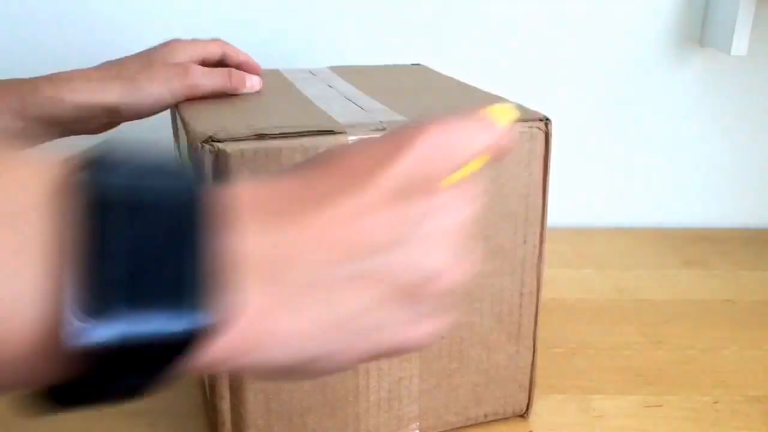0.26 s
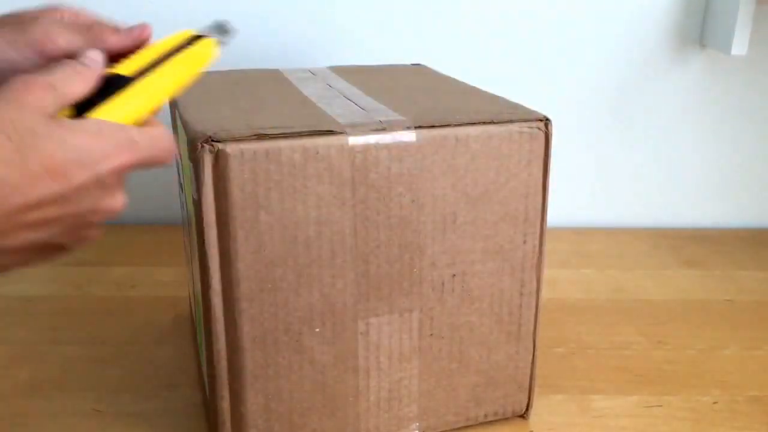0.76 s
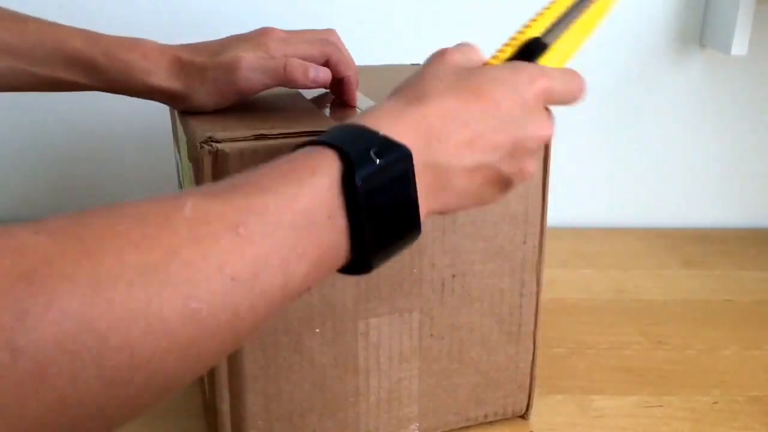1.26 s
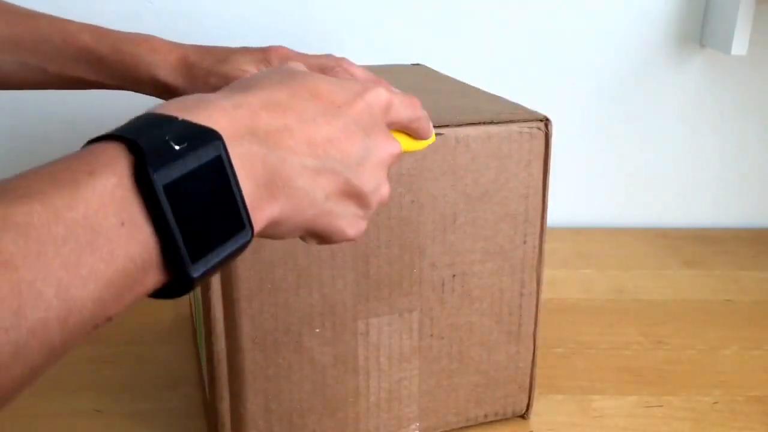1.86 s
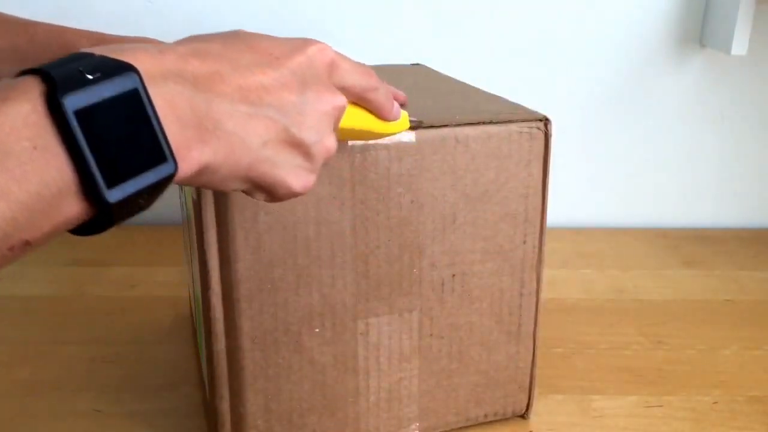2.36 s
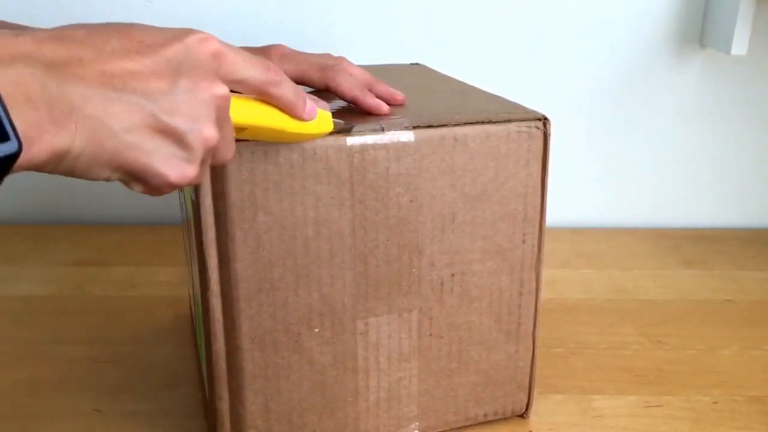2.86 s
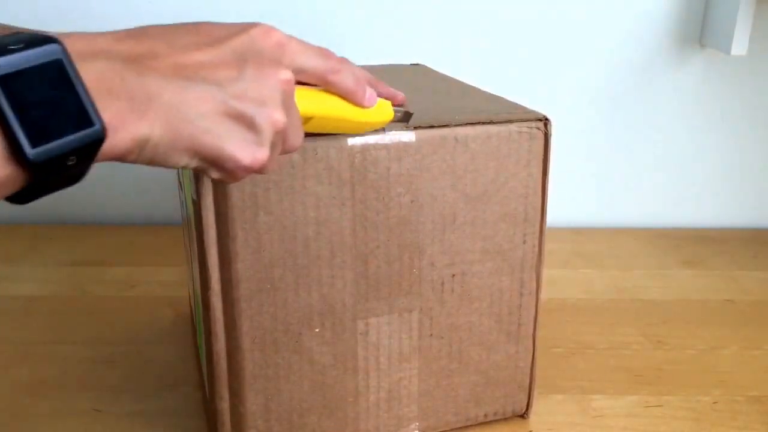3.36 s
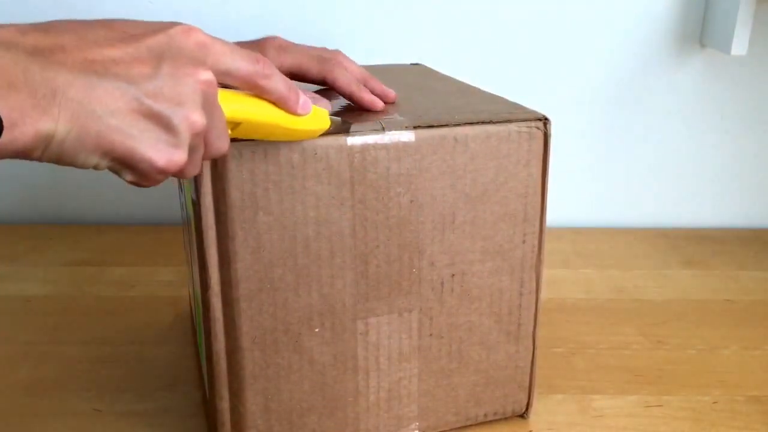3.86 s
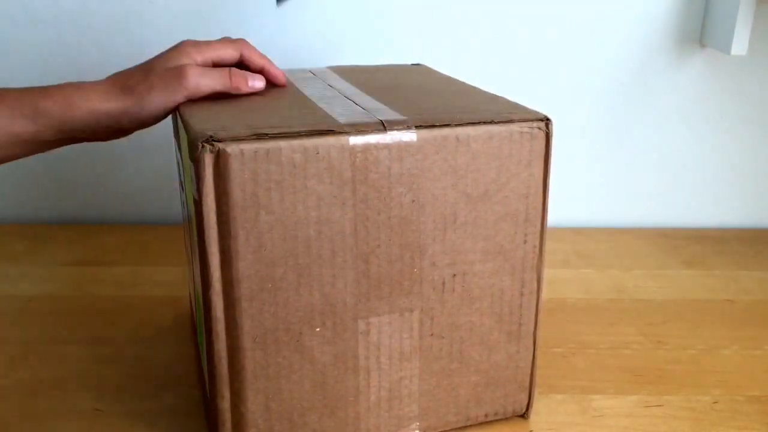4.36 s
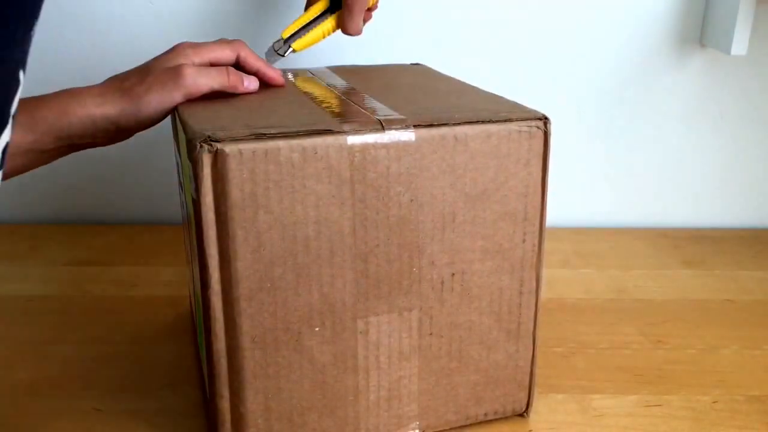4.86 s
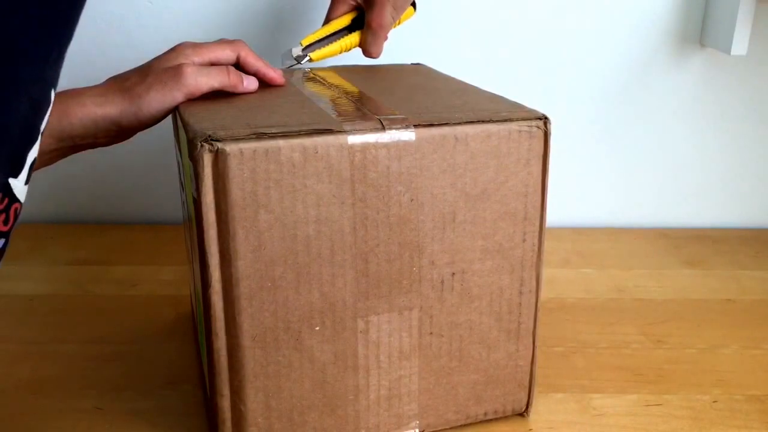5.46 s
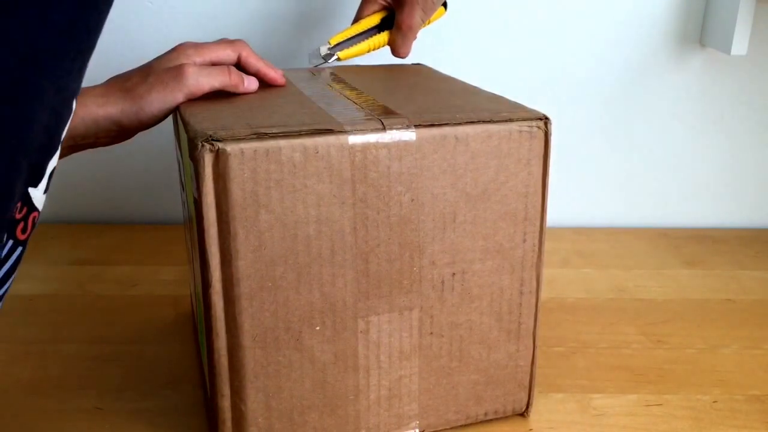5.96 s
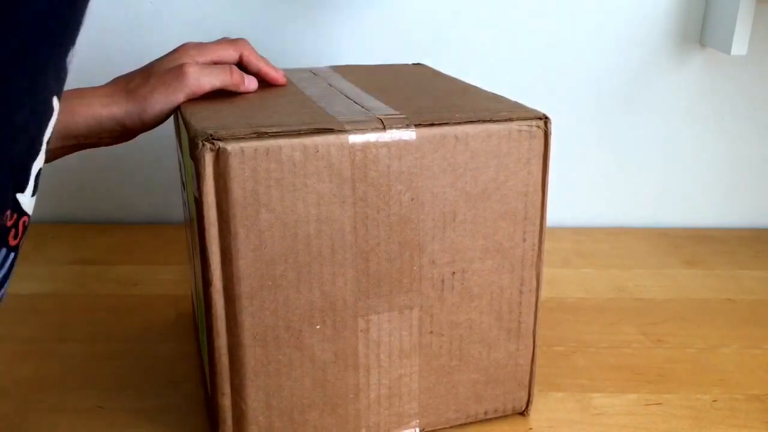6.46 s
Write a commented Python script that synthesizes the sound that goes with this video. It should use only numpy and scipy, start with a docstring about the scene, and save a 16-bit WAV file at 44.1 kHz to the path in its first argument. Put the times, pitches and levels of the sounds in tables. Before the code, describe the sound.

Close up in a small hard-walled room, hands work a knife over a taped carton. Thin plastic and steel clicks come irregularly, over soft rubbing and low boxy thuds, the strongest early on. Brief hissy scrapes cut tape at the start and midway; later the action quiets into gritty little sawing strokes, ending with a click and a cluster of hollow knocks. Faint room air lies beneath.

```python
"""A utility knife is handled over a taped cardboard box on a wooden table in a small bare room.
From the start the loose blade clicks in its plastic handle: noise bursts ring the knife's resonances.
Hands knock (force pulses into the modes) and rub the hollow box; the blade cuts at the start and near
2.5 s, and saws through the tape late on (uneven noise through resonances); last knocks and clicks follow.
Throughout, the walls answer sharp sounds with a short bright tail over a faint bed of room air."""
import sys
import numpy as np
from scipy import signal
from scipy.fft import rfft, irfft, next_fast_len
from scipy.io import wavfile
from scipy.ndimage import uniform_filter1d

SR = 44100
rng = np.random.default_rng(int(sys.argv[2]) if len(sys.argv) > 2 else 0)


def put_to_file(sound):
    """Save the sound as 16-bit audio at rate SR, in the file named by the first command-line argument."""
    columns = np.atleast_2d(sound).T  # one column per channel
    safe = np.clip(columns, -1, 1)
    whole_steps = np.round(safe * 32767)
    wavfile.write(sys.argv[1], SR, whole_steps.astype(np.int16))


N = 295690

# board surface resonances: (centre [Hz], width [Hz], level [dB])
BOARD = [(370, 80, -7), (618, 50, -3.5), (797, 160, -8.5), (1210, 520, -10), (1740, 430, -10),
         (2550, 100, -6.5)]


def clicks(scatter_db=2.0, bounce_db=4.5, low_hz=1300, snap_db=2.5):
    """The blade slips, snaps home and rattles out; each click's mode levels are scattered at random."""
    # blade clicks: (time [s], loudest short-term rms before the high-pass [dB], handle shell [dB],
    # blade tip [dB], rattle decay constant [ms])
    click_list = [(0.102, -27, -8, -10, 1.8), (0.1092, -26, -10, -10.5, 1.5), (0.2303, -38.5, 4, -13, 0.73),
                  (0.3804, -63.5, -19, -19, 4), (0.417, -42.5, -26, -14, 1.1),
                  (0.4444, -37.5, -38, -19, 2.2), (0.639, -26, -24, -14, 1.7), (0.7904, -40, -22, -28, 1.4),
                  (0.8563, -47.5, -30, -24, 1.9), (0.8755, -29.5, -13, -21.5, 2.6),
                  (0.9746, -23.5, -38, -12.5, 0.72), (1.0968, -36.5, -29, -20, 3.1),
                  (1.3052, -51, -22, -15, 9.5), (1.3493, -36.5, -32, -20, 3.7), (1.439, -50, -30, -18, 5.1),
                  (1.4526, -27, -40, -16, 1.9), (1.4949, -38, -39, -21, 4.6), (1.61, -54.5, -28, -11, 4),
                  (1.6691, -58, -24, -14, 4), (1.7155, -29.5, -20, -15, 1.6),
                  (1.7489, -33.5, -14, -16, 2.1), (1.9516, -32, -17, -13.5, 3.2),
                  (2.0015, -42, -10, -22, 18), (2.169, -31, -8.5, -10.5, 1.2), (2.2787, -60, -16, -10, 4),
                  (2.318, -48.5, 3.5, -7, 16), (2.694, -50, -24.5, -14, 3.3), (3.057, -36, -8, -18, 11),
                  (3.3208, -26.5, -3, -12, 5.3), (3.529, -54, 4, -17, 2.3), (3.682, -48.5, 5, -17, 9.6),
                  (3.697, -48, -15, -13, 7.3), (3.85, -56, -24, -7, 2.4), (3.905, -43, -24, -13, 0.77),
                  (3.939, -36, -11, -15, 5.2), (3.95, -35, -16.5, -18, 2.2), (4.097, -31, -29, -15, 5),
                  (4.1234, -35, -6.5, -18, 6.5), (4.1628, -33, -27, -26, 6.9), (4.198, -41, -34, -16, 5.8),
                  (4.28, -37.5, -32, -28, 3.7), (4.327, -51, -28, -35, 4.8), (4.4069, -28, -27, -23, 4.7),
                  (4.4774, -39, -23, -17, 3.2), (4.655, -40, -33, -20, 6.9), (4.775, -61, -19, -23.5, 9.2),
                  (5.0905, -33, -52, -18, 5.2), (5.239, -59.5, -5, -22, 2), (5.267, -56.5, -24, -20, 3),
                  (5.3512, -52, -14, -15, 4.6), (5.3823, -54.5, -8, -22, 4), (5.602, -50, -22, -20, 4.3),
                  (6.0542, -42.5, -18, -18, 9.6), (6.2762, -37.5, 0, -18, 5), (6.404, -28.5, -36, -15, 3.8),
                  (6.5935, -45.5, -16, -21, 1.4), (6.6288, -46.5, -16, -18, 8.1)]
    # knife resonances: (centre [Hz], width [Hz], level before tilt and scatter [dB])
    knife_modes = [(1920, 70, 2.5), (2080, 270, 2), (2800, 130, -7.5), (3570, 440, 7.5), (4010, 330, 9.5),
                   (5680, 3150, 10), (6530, 520, -5), (8120, 1100, 10.5), (9160, 970, 14.5),
                   (10730, 870, 18), (12300, 1600, 8.5), (14400, 650, -12)]
    slip_ms, slip_per_rattle = 0.51, 0.29  # build-up constant, longer when the rattle is longer
    creep_db, creep_ms = -22.5, 4.5  # faint scrape as the blade starts to move
    slider_db, steel_db = -10, -7  # how strongly a click wakes these parts
    lead = 600  # samples before the snap
    out = np.zeros(N)
    t = (np.arange(3600) - lead) / SR
    scatters = rng.standard_normal((len(click_list), len(knife_modes)))
    noises = rng.standard_normal((len(click_list), len(t)))
    bounces = np.repeat(rng.standard_normal((len(click_list), len(t) // 30)), 30, axis=1)
    for (s, db, shell_db, tip_db, rattle_ms), scatter, noise, bounce in zip(
            click_list, scatters, noises, bounces):
        rise = t * 1000 / (slip_ms + slip_per_rattle * rattle_ms)
        fall = -t * 1000 / max(rattle_ms, .5)
        creep = (t < 0) * undb(creep_db) * np.exp(np.minimum(t, 0) * 1000 / creep_ms)
        envelope = np.exp(np.minimum(rise, fall)) + creep
        force = noise * undb(bounce_db * bounce) * envelope
        force[lead] += undb(snap_db)  # the moment steel meets its stop
        part_db = [shell_db, slider_db, slider_db, steel_db, tip_db]
        ring = 0
        for (hz, width_hz, mode_db), g in zip(knife_modes, scatter):
            tilt_db = np.interp(hz, [2400, 3370, 4200, 5660, 9700], part_db)
            ring = ring + undb(mode_db + tilt_db + scatter_db * g) * resonance(force, hz, width_hz)
        loudest = np.sqrt(uniform_filter1d(ring ** 2, 200).max())
        add(out, s - lead / SR, undb(db) * ring / loudest)
    # so small a body radiates no bass
    return signal.sosfilt(signal.butter(4, low_hz, "high", fs=SR, output="sos"), out)


def knocks(crack_ms=8.5, crack_hz=900):
    """A push and rebound (shorter wakes higher modes) and a dull crackle of crushed corrugation."""
    # hands and knife on the box: (time [s], thud peak [dB], cardboard crack peak [dB], contact time [ms])
    knock_list = [(0.102, -33.5, -47, 7.6), (0.303, -37, -45, 4), (1.008, -21, -47.5, 6.5),
                  (1.0146, -26, -56, 6.5), (1.192, -38.5, -65, 6.7), (1.243, -36.5, -63, 5.2),
                  (1.266, -54, -48, 4.1), (1.312, -46.5, -61, 8.6), (1.584, -35, -54.5, 4.9),
                  (1.946, -50.5, -42, 4.2), (2.171, -50.5, -54, 2.9), (2.313, -49.5, -52.5, 3.1),
                  (2.545, -41.5, -45, 3.7), (2.694, -37, -49, 3.9), (3.051, -52, -49.5, 5.5),
                  (3.316, -46, -46.5, 4), (3.679, -57, -44, 4.4), (3.713, -49.5, -51, 9.4),
                  (3.813, -53.5, -60, 2.4), (3.849, -49, -46.5, 2.1), (3.905, -36, -37.5, 3.9),
                  (3.947, -57, -43.5, 2.9), (4.009, -44.5, -49, 6), (4.306, -49.5, -52, 3.1),
                  (4.95, -50, -64.5, 5.4), (5.233, -55.5, -64, 5.5), (5.39, -47.5, -76, 6.4),
                  (6.56, -45, -55, 2.7), (6.592, -36, -36, 6), (6.627, -27, -34, 3.7),
                  (6.661, -34.5, -50, 6.9)]
    thuds, cracks = np.zeros(N), np.zeros(N)
    t = np.arange(SR // 2) / SR
    dull = signal.butter(1, crack_hz, fs=SR)
    noises = rng.standard_normal((len(knock_list), len(t)))
    for (s, thud_db, crack_db, contact_ms), noise in zip(knock_list, noises):
        phase = np.pi * np.minimum(t * 1000 / max(contact_ms, .3), 1)
        push = np.sin(2 * phase) * np.sin(phase)
        thud = box(push, air_db=5)
        crush = signal.lfilter(*dull, noise * np.exp(-t * 1000 / crack_ms))
        crack = resonate(crush, BOARD)
        add(thuds, s, undb(thud_db) * thud / np.abs(thud).max())
        add(cracks, s, undb(crack_db) * crack / np.abs(crack).max())
    return thuds, cracks


def box(force, air_db=0):
    """The hollow carton rings in its wall modes and pumps its air; air_db is added to the air mode."""
    # carton modes, the second being the air mode: (frequency [Hz], level before air_db [dB], t60 [s])
    box_modes = [(72, -18.5, 0.054), (134.3, -3.5, 0.31), (163.8, -4.5, 0.22), (188.2, -5.5, 0.21),
                 (232.1, -7, 0.14), (283.7, -10.5, 0.2), (382.6, -17.5, 0.4), (424, -9.5, 1),
                 (577, -36.5, 0.29)]
    rings = [undb(db) * resonance(force, hz, np.log(1000) / np.pi / t60) for hz, db, t60 in box_modes]
    return sum(rings) + (undb(air_db) - 1) * rings[1]


def sawing():
    """The blade saws along the tape: hiss with singing steel, flapping slit edges, shaken box walls."""
    # saw strokes: (full from [s], held [s], hiss [dB], flaps [dB], box wall [dB])
    saw_strokes = [(5.41, 0.085, -54, -65, -61.5), (5.605, 0.039, -58.5, -67, -61.5),
                   (5.69, .03, -55, -66.5, -60.5), (5.735, 0.054, -47.5, -60, -58),
                   (5.835, 0.036, -48, -62.5, -56.5), (5.98, 0.06, -48, -59.5, -55.5),
                   (6.045, 0.038, -48.5, -56.5, -55), (6.27, .13, -49.5, -61, -57)]
    # tape hiss spectrum, relative: (frequency [Hz], level per Hz [dB])
    tape_hiss = [(1180, -48.5), (2000, -26), (2290, -7.5), (3970, -12), (5740, -5), (11300, -5),
                 (15500, -14)]
    # flaps beside the cut: (centre [Hz], width [Hz], level [dB])
    slit_modes = [(433, 17, -4), (815, 32, 0.5), (1001, 55, 3.5), (1683, 180, -1), (2214, 28, 4.5)]
    # steel singing in the cut: (centre [Hz], width [Hz], level [dB])
    blade_modes = [(3630, 15, 14.5), (4490, 65, 18), (5680, 180, 6.5), (6430, 80, 12.5), (8060, 100, -3),
                   (8420, 140, 11), (9870, 390, -3)]
    gains = pressure(saw_strokes, rise_db_s=278, fall_db_s=329)
    return drag(gains, tape_hiss, slit_modes, grain_db=0.8, surge_db=1.3, air_db=-1.5, singing=blade_modes)


def sliding():
    """Slides: the blade drags through the tape at the start and near 2.5 s, hands rub elsewhere."""
    # slide strokes: (full from [s], held [s], hiss [dB], board surface [dB], box wall [dB])
    slide_strokes = [(0.0, 0.1, -41.5, -47, -52), (0.27, 0.056, -59.5, -62.5, -54.5),
                     (0.68, 0.13, -59, -79, -88), (0.9, .05, -68, -76, -81),
                     (1.03, 0.071, -56.5, -65.5, -50), (1.15, 0.14, -67.5, -70.5, -57),
                     (1.52, 0.26, -60.5, -91, -64.5), (1.77, 0.016, -65, -83, -69),
                     (2.0, 0.024, -67, -65, -71), (2.27, 0.12, -64, -70.5, -66.5),
                     (2.52, 0.14, -45.5, -53, -48.5), (2.7, 0.13, -47, -53.5, -49.5),
                     (3.1, 0.018, -55, -71, -73), (3.4, 0.017, -52.5, -65.5, -63.5),
                     (3.5, 0.06, -60.5, -72, -71.5), (3.68, 0.048, -60, -67, -61),
                     (3.9, 0.061, -57, -58.5, -57), (4.05, 0.021, -54, -68.5, -64),
                     (4.19, 0.1, -49.5, -72, -70), (4.42, 0.21, -71, -76, -77.5),
                     (4.7, 0.1, -74, -78.5, -79), (5.18, 0.16, -76, -89, -74),
                     (6.59, 0.083, -54, -63, -48.5)]
    # slide hiss spectrum, relative: (frequency [Hz], level per Hz [dB])
    slide_hiss = [(1180, -36), (2000, -19.5), (2540, -4), (3150, -15), (3460, -9), (6750, -10),
                  (7550, -9.5), (11600, -2.5), (15500, -15.5)]
    gains = pressure(slide_strokes, rise_db_s=388, fall_db_s=239)
    return drag(gains, slide_hiss, BOARD, grain_db=1.04, surge_db=2.2, air_db=3.0)


def drag(gains, hiss_colour, surface, grain_db, surge_db, air_db, singing=()):
    """Sliding contact hisses, scrapes the surface resonances and shakes the box walls."""
    hiss_gain, surface_gain, wall_gain = gains
    slips = grit(grain_db, grain_ms=3.3, surge_db=surge_db)
    hiss = unit(colour(slips + resonate(slips, singing), hiss_colour))
    scrape = unit(resonate(slips, surface))
    shake = grit(spread_db=2.5, grain_ms=8.0)
    steady_rms = np.sqrt(np.mean(box(shake, air_db) ** 2))
    walls = box(wall_gain * shake, air_db) / steady_rms  # gain ahead of the modes: they ring on
    return hiss_gain * hiss + surface_gain * scrape + walls


def pressure(strokes, rise_db_s, fall_db_s):
    """Each stroke swells, holds and dies away; gains of hiss, surface and wall, the loudest stroke leading."""
    t = np.arange(N) / SR
    out = 0
    for s, held_s, *levels_db in strokes:
        swell_db = -rise_db_s * np.maximum(s - t, 0)
        fade_db = -fall_db_s * np.maximum(t - s - held_s, 0)
        out = np.maximum(out, undb(swell_db + fade_db) * undb(levels_db)[:, None])
    return out


def grit(spread_db, grain_ms, surge_db=2.98, surge_ms=12.0):
    """Dense slips of unequal size that come in surges as the contact grabs and lets go; rms 1."""
    return unit(uneven(spread_db, grain_ms) * uneven(surge_db, surge_ms) * rng.standard_normal(N))


def uneven(spread_db, ms):
    """Random gains held for ms and slewed."""
    size = max(int(ms * SR / 1000), 1)
    gains = undb(spread_db * rng.standard_normal(N // size + 1))
    return uniform_filter1d(np.repeat(gains, size)[:N], size)


def wandering_echoes(x, turns_hz=0.8):
    """The knife wanders, so its echoes blend between two spots of the room, each with its own tail."""
    spot = 2 * np.pi * turns_hz * np.arange(N) / SR
    return room(x * np.cos(spot)) + room(x * np.sin(spot))


def room(x, first_ms=1.2):
    """Diffuse noise tail of unit energy, rising over first_ms; each band decays at its own rate."""
    # room bands: (centre [Hz], t60 [s], relative starting level [dB])
    room_bands = [(300, 0.17, 6), (1260, 0.37, 1), (3478, 0.25, 8), (7300, 0.24, 5), (12400, 0.17, 9)]
    t = np.arange(int(SR * .6)) / SR
    hz, t60_s, db = np.transpose(room_bands)
    log_hz = np.log(np.maximum(np.fft.rfftfreq(len(t), 1 / SR), 1))
    noise = rfft(rng.standard_normal(len(t)))
    tail = 0
    for k, share in enumerate(np.eye(len(room_bands))):  # overlapping bands that add up to white
        band = irfft(noise * np.interp(log_hz, np.log(hz), share), len(t))
        tail = tail + undb(db[k] - 60 * t / t60_s[k]) * band
    tail = tail * np.minimum(t * 1000 / first_ms, 1)
    return signal.fftconvolve(x, tail / np.sqrt(np.sum(tail ** 2)))[:N]


def room_air(rms_db=-71.5):
    """Steady background: coloured Gaussian noise."""
    # background spectrum, relative: (frequency [Hz], level per Hz [dB])
    air_spectrum = [(18, -56), (30, 6), (133, 13.5), (728, -4.5), (1770, -8), (4090, -11), (4420, -10),
                    (7650, -16.5), (11000, -9.5), (15500, -41)]
    return undb(rms_db) * unit(colour(rng.standard_normal(N), air_spectrum))


def undb(db):
    """Decibels to amplitude."""
    return 10 ** (np.asarray(db) / 20)


def unit(x):
    """Scale to rms 1."""
    return x / np.sqrt(np.mean(x ** 2))


def resonance(x, hz, width_hz):
    """Two-pole band-pass, gain 1 at the centre."""
    return signal.lfilter(*signal.iirpeak(hz, hz / width_hz, fs=SR), x)


def resonate(x, modes):
    """Sum of (Hz, width Hz, dB) resonances; neighbours swing in opposite sense."""
    out = 0
    for k, (hz, width_hz, db) in enumerate(modes):
        out = out + (-1) ** k * undb(db) * resonance(x, hz, width_hz)
    return out


def colour(x, points):
    """Shape by (Hz, dB) points joined on a log-frequency axis."""
    hz, db = np.transpose(points)
    size = next_fast_len(len(x))
    f = np.maximum(np.fft.rfftfreq(size, 1 / SR), 1)
    gain = undb(np.interp(np.log(f), np.log(hz), db))
    return irfft(rfft(x, size) * gain, size)[:len(x)]


def add(out, s, x):
    """Mix x into out from time s."""
    i = int(s * SR)
    out[i:i + len(x)] += x[:len(out) - i]


def scene(echo_db=-0.5):
    """Mix all layers; the thuds ring on by themselves, so only sharp sounds show the room."""
    thuds, cracks = knocks()
    sharp = clicks() + cracks
    echoes = undb(echo_db) * wandering_echoes(sharp)
    return (sharp + echoes + thuds + sliding() + sawing() + room_air())[None]


def record(dry, top_hz=15600):
    """The microphone thins the deepest bass and the top octave; the recorder cuts above top_hz."""
    # microphone response: (frequency [Hz], level [dB])
    mic_response = [(25, -18.5), (40, -1.5), (70, 1.5), (12000, -0.5), (13500, -6.5), (15500, -9.5)]
    top_cut = signal.ellip(10, .2, 70, top_hz, fs=SR, output="sos")
    return signal.sosfilt(top_cut, colour(dry[0], mic_response))[None]


dry = scene()
out = record(dry)
put_to_file(out)
```